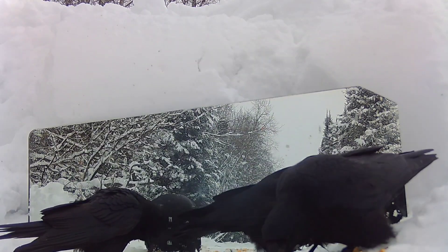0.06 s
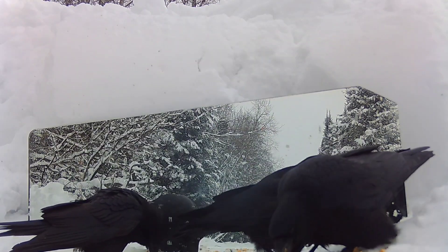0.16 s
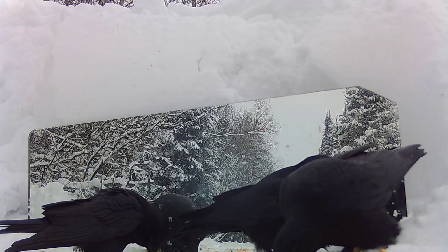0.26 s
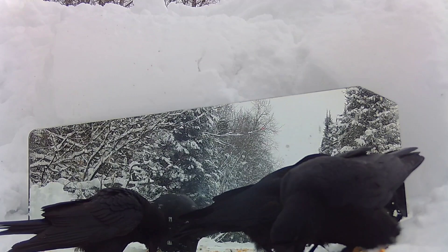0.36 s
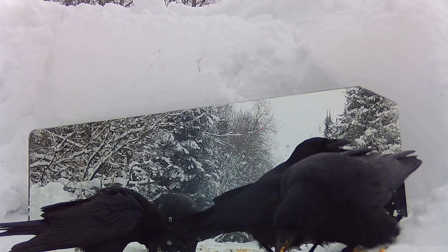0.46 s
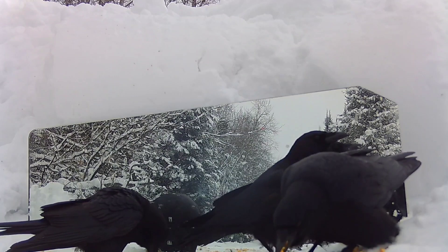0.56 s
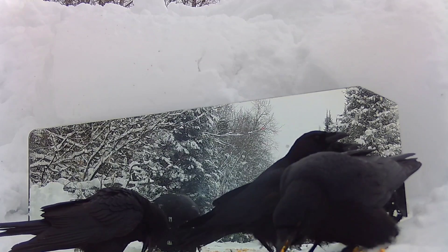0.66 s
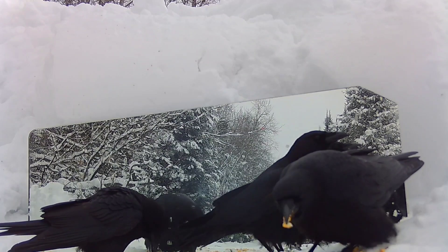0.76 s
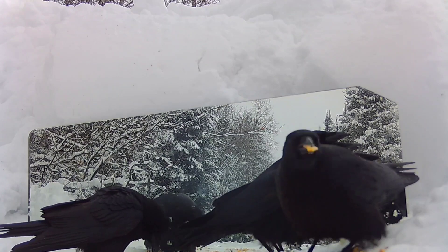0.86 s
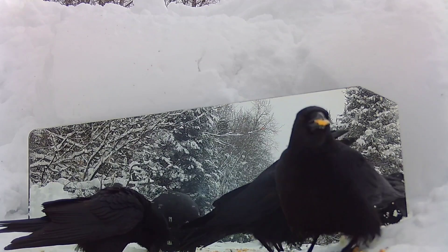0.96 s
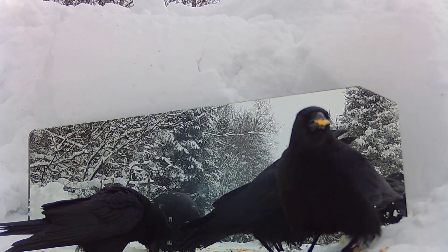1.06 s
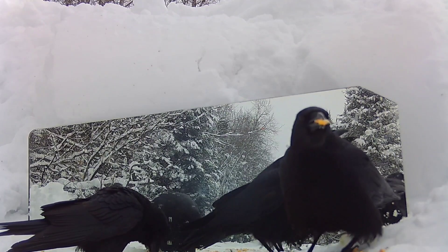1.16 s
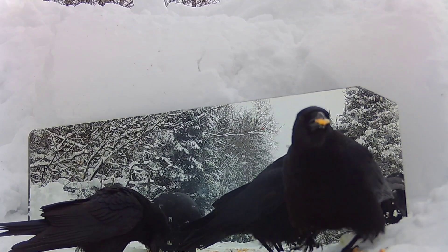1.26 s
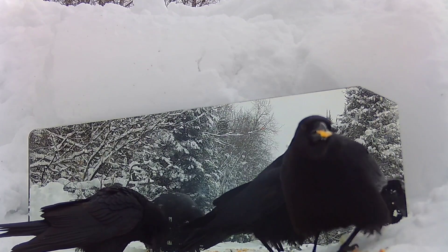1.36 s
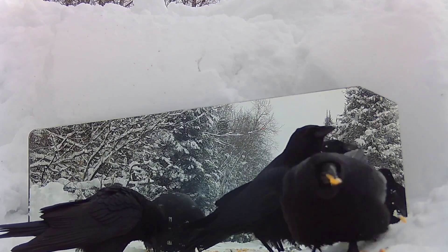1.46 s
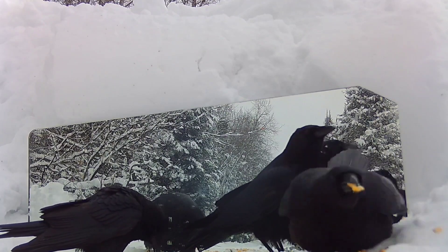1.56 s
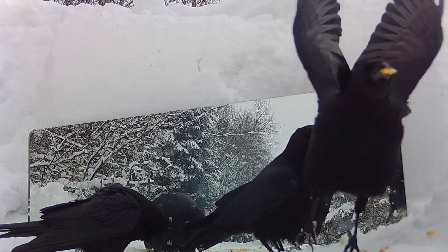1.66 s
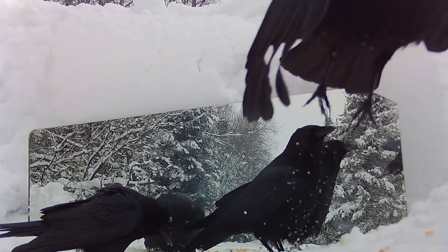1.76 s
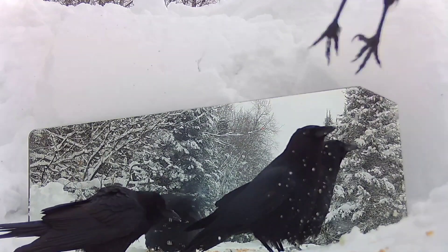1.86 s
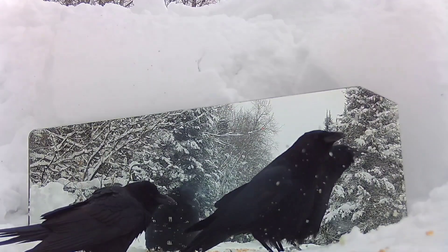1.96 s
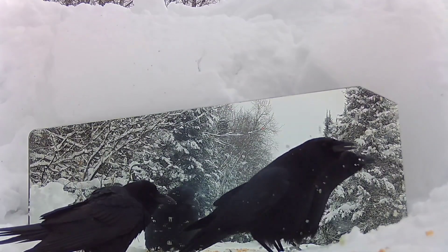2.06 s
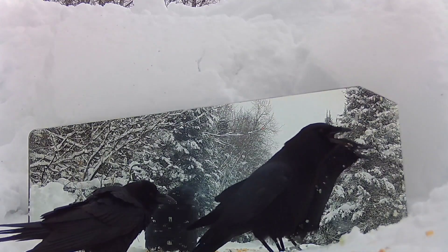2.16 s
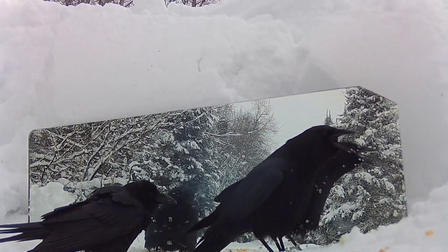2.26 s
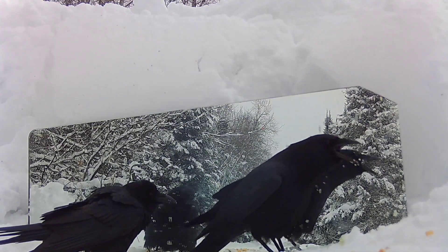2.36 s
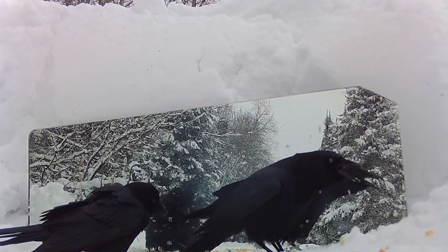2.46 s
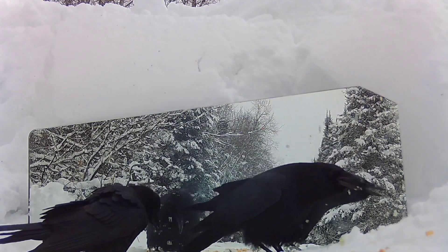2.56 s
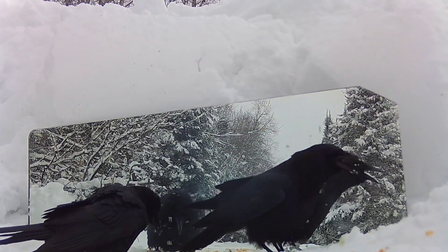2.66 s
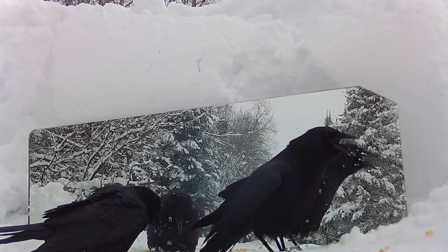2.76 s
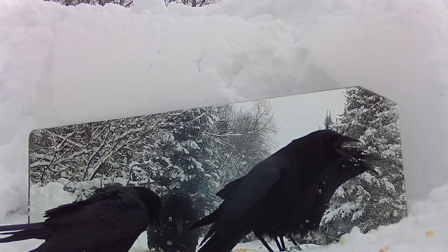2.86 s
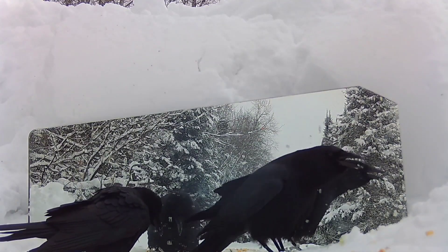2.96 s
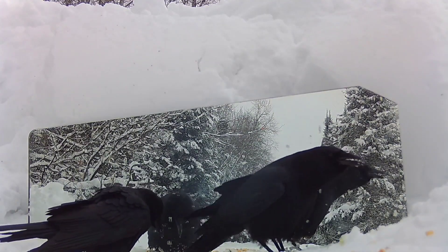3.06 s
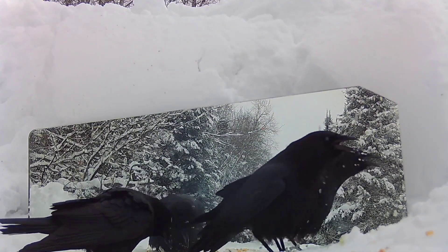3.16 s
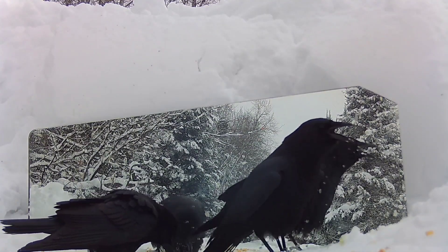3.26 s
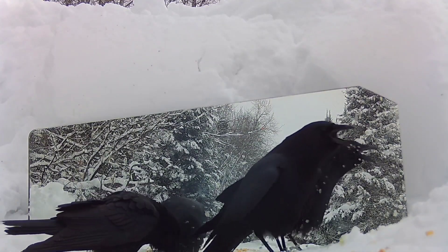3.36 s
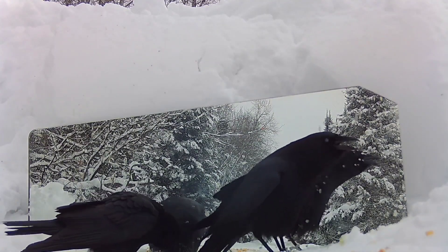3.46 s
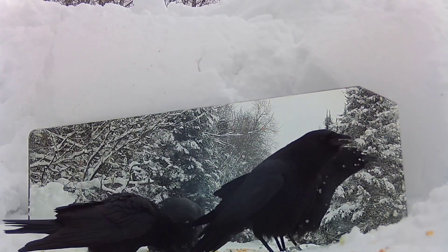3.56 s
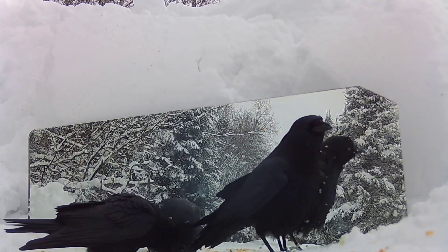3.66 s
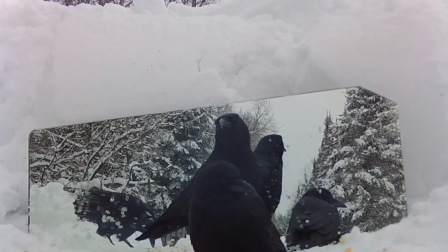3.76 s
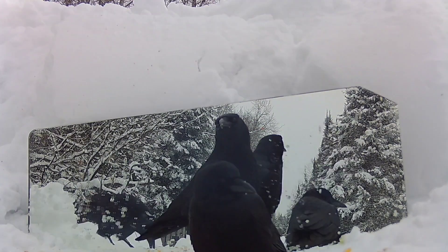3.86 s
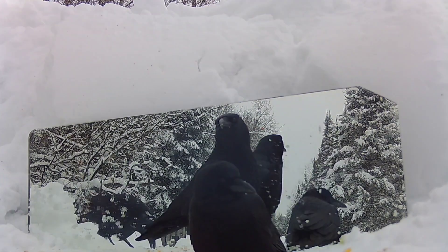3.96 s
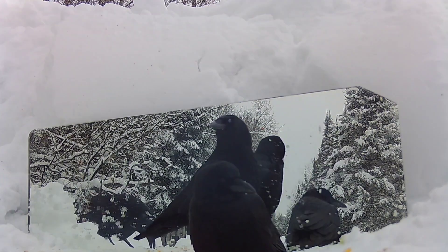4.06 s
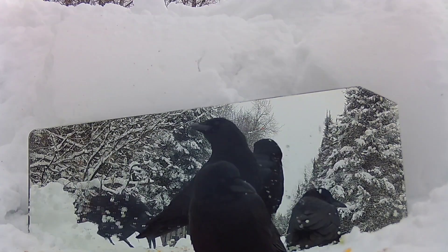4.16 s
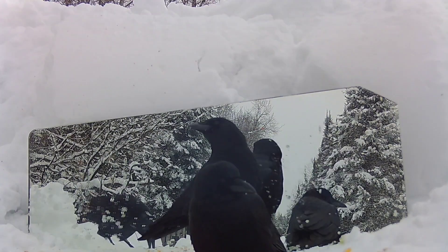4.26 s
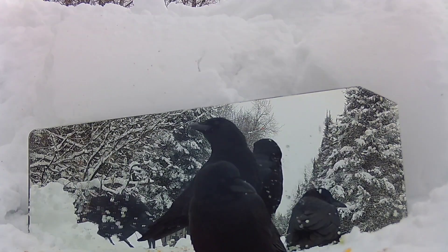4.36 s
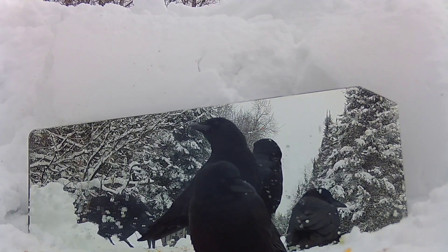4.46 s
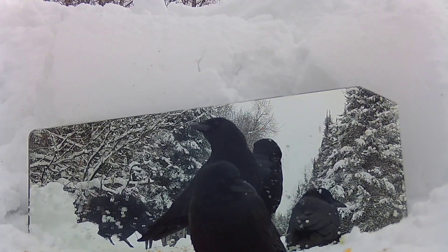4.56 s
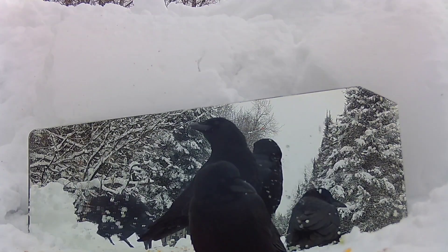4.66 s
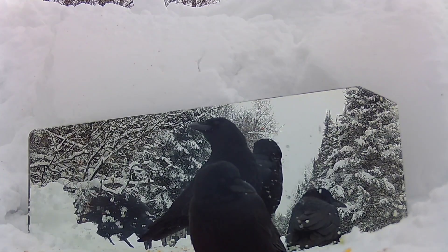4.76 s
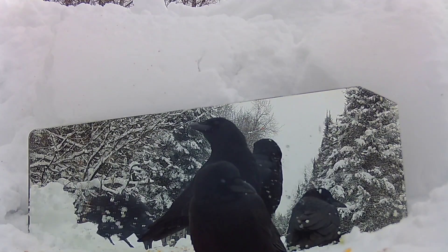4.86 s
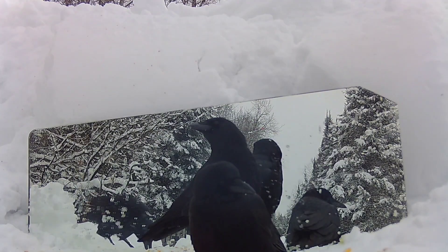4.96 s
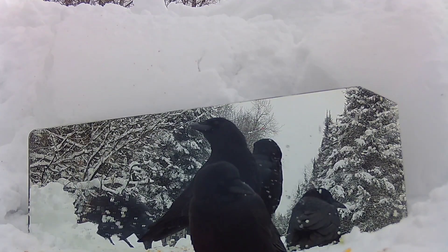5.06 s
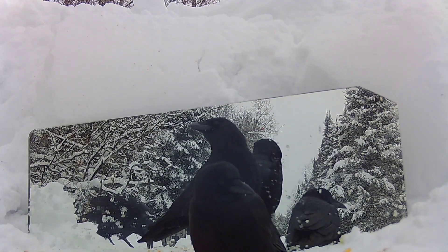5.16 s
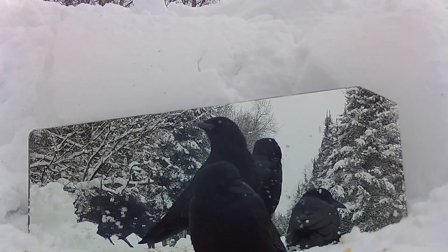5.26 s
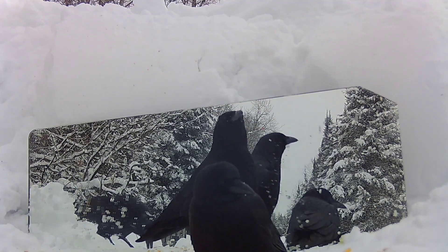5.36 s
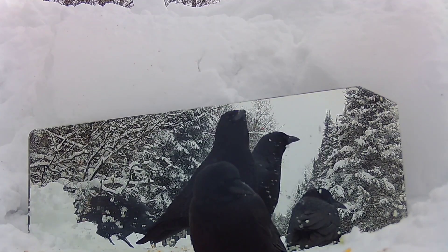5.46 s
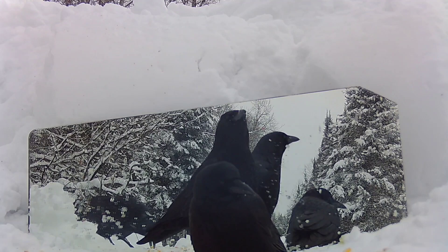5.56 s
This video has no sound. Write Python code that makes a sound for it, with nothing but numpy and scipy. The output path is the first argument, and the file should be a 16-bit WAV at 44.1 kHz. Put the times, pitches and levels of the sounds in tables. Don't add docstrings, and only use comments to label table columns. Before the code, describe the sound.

A crow takes off with rustling wings and buffeting air, another caws three times, harsh and overloaded, then a quiet snowy yard with a far engine.

```python
import sys
import numpy as np
from scipy import signal
from scipy.io import wavfile
from scipy.ndimage import uniform_filter1d

SR = 44100
rng = np.random.default_rng(int(sys.argv[2]) if len(sys.argv) > 2 else 0)


def nominal_scale(level):
    x = np.asarray(level, float) / 20
    return 10 ** x


def pcm_store(signal):
    levels = np.round(np.clip(np.atleast_2d(signal), -1, 1) * 32767)
    wavfile.write(sys.argv[1], SR, levels.astype(np.int16).T)


N = 246959
DROPOUT_START_S, DROPOUT_END_S = 3.7, 3.743


def read_spectrum(points, hz):
    table_hz, level_db = np.transpose(points)
    return np.interp(np.log(hz + 1), np.log(table_hz + 1), level_db)


def evened(x):
    return x / np.sqrt(np.mean(x ** 2) + 1e-20)


def add(mix, start_s, sound):
    part = mix[round(start_s * SR):][:len(sound)]
    part += sound[:len(part)]


def noise(colour, patchy_db, flicker_db, size):
    hz = np.fft.rfftfreq(size, 1 / SR)
    frames = 4 * N // size + 5
    real, imag, patches = rng.standard_normal((frames, len(hz), 3)).T
    patches = uniform_filter1d(patches, size=10, axis=0)
    patches = evened(uniform_filter1d(patches, size=8, axis=1))
    flicker = evened(uniform_filter1d(rng.standard_normal(frames), size=3))
    level_db = read_spectrum(colour, hz)[:, None] + patchy_db * patches + flicker_db * flicker
    spectrum = (real + 1j * imag) * nominal_scale(level_db)
    return evened(signal.istft(spectrum, nperseg=size, noverlap=3 * size // 4)[1][:N])


def swells(rows, rise_db, fall_db):
    t = np.arange(N) / SR
    gain = np.zeros(N)
    for peak_s, db, rise_s, fall_s in rows:
        rising = rise_db * (peak_s - t) / rise_s
        falling = fall_db * (t - peak_s) / fall_s
        gain += nominal_scale(db + np.where(t < peak_s, rising, falling))
    return uniform_filter1d(gain, size=200)


def ring(x, hz, width_hz):
    carrier = np.exp(2j * np.pi * np.cumsum(hz) / SR)
    decay = np.exp(-np.pi * width_hz / SR)
    return (carrier * signal.lfilter([1], [1, -decay], x / carrier)).imag


def place(at, sizes, count):
    taps = np.arange(-8, 9) + np.round(at)[:, None]
    shape = np.sinc(taps - at[:, None]) * np.hanning(taps.shape[1] + 2)[1:-1]
    index = np.clip(taps, 0, count - 1).astype(int)
    return np.bincount(index.ravel(), (shape * sizes[:, None]).ravel(), count)


# (frequency [Hz], density [dB per Hz])
HISS_COLOUR = [(8.8, -28), (15, -1.5), (52, -9.5), (300, -17), (509, -19), (1080, -21.5), (1780, -22.5),
               (3900, -22.5), (15800, -24)]


def preamp_hiss():
    return nominal_scale(-59.5) * noise(HISS_COLOUR, 0.93, .4, size=2048)


# (frequency [Hz], density [dB per Hz])
YARD_COLOUR = [(8.8, -41), (15, -15.5), (43, -8), (77, -3.5), (112, -7.5), (260, -7.5), (329, -13.5),
               (624, -18), (1050, -15.5), (2600, -26.5), (4650, -28), (6220, -26.5), (8330, -29),
               (14500, -29), (15800, -29)]


def yard_air():
    return nominal_scale(-54.5) * noise(YARD_COLOUR, 1.1, .5, size=2048)


def motor():
    t = np.arange(N) / SR
    note = evened(ring(rng.standard_normal(N), np.full(N, 75.1), 9.3))
    fade_db_per_s = -6
    return nominal_scale(-52 + fade_db_per_s * (t - DROPOUT_END_S)) * note


# (time [s], peak [dB], centre [Hz], body at 1-2.5 kHz [dB], thud below 1 kHz [dB])
TICK_EVENTS = [(0.281, -33.5, 7240, -14, -27), (0.2902, -41.5, 6070, -8, -17),
               (0.9567, -40.5, 6740, -16, -10), (1.3607, -48.5, 5940, -25, -10),
               (1.569, -43.5, 6600, -25, -15), (1.5868, -53, 6750, -21, -14),
               (1.786, -21.5, 6660, -22, -19), (1.81, -32, 6430, -27, -31), (1.9232, -27, 6260, -8.5, -35),
               (1.986, -27.5, 8240, -25, -18), (2, -32, 4470, -14, -11), (2.069, -34, 6600, -15, -8),
               (2.108, -37.5, 6060, -4, -1), (4.3072, -41.5, 5710, -28, -20), (4.7211, -47, 5600, -20, -21),
               (4.7391, -50, 5320, -12.5, -18.5), (4.8497, -56, 5990, -7, -22),
               (5.045, -54, 5190, -10.5, -18.5), (5.1801, -50, 6210, -10, -20),
               (5.278, -47, 6750, -17, -19.5), (5.2876, -50, 7190, -13, -20)]


def ticks():
    out = np.zeros(N)
    t = np.arange(2500) / SR
    attack_s, t60_s = 0.00039, 0.029
    for start_s, peak_db, hz, body_db, thud_db in TICK_EVENTS:
        burst = np.zeros(len(t))
        for low_hz, high_hz, db in [(0.74 * hz, 1.38 * hz, 0), (1000, 2400, body_db), (250, 900, thud_db)]:
            band = signal.butter(2, [low_hz, high_hz], "band", fs=SR)
            burst += nominal_scale(db) * evened(signal.lfilter(*band, rng.standard_normal(len(t))))
        envelope = nominal_scale(peak_db - 3.5 - 60 * t / t60_s) * np.minimum(t / attack_s, 1)
        add(out, start_s, envelope * burst)
    return out


# (time [s], level [dB], length [s])
AIR_PUSHES = [
    (2.5795, -10.5, .0155),
    (1.962, -26, .04),
    (2.957, -22, .025),
]


def air_pushes():
    out = np.zeros(N)
    lowpass = signal.butter(6, 1000, fs=SR, output="sos")
    rattle_band = signal.butter(2, [350, 950], "band", fs=SR)
    for start_s, db, length_s in AIR_PUSHES:
        u = np.arange(0, length_s, 1 / SR) / length_s
        push = np.tanh(1.8 * np.sin(2 * np.pi * u ** 1.3)) * np.sin(np.pi * u) ** .9
        rattle = evened(signal.lfilter(*rattle_band, rng.standard_normal(len(u)))) * np.sin(np.pi * u)
        thump = nominal_scale(db) * push + nominal_scale(2 * db - 11) * rattle
        add(out, start_s, signal.sosfilt(lowpass, np.r_[thump, np.zeros(300)]))
    return out


# (time [s], rustle [dB], heave [dB], buffet [dB],
# length [s])
STROKES_AND_GUSTS = [(1.362, -60, -85, -85, .03), (1.426, -66, -85, -85, .04), (1.58, -61, -79.5, -83, 0.27),
                     (1.72, -41.5, -46, -60, .05), (1.805, -36.5, -40, -36.5, 0.043),
                     (1.902, -46, -43, -58, 0.24), (1.99, -36.5, -32.5, -39, 0.061),
                     (2.075, -43, -37, -53, 0.021), (2.15, -43, -29.5, -41, 0.069),
                     (2.23, -79.5, -37, -55, 0.047), (2.42, -80, -40.5, -31, 0.13),
                     (2.528, -81.5, -27, -17.5, 0.079), (2.6, -79, -22, -22.5, 0.015),
                     (2.8, -80.5, -23.5, -60.5, 0.12), (2.93, -80.5, -33.5, -35, 0.067),
                     (3.06, -80, -40.5, -58, 0.095), (3.18, -80.5, -49, -53.5, 0.045),
                     (3.316, -81, -40, -70, 0.059), (3.426, -78.5, -38.5, -70.5, 0.04),
                     (3.53, -80.5, -56, -81, 0.068)]
# (rustle [dB], heave [dB], buffet [dB])
STROKE_LOSS_DB = (-11.5, -13, -16.5)
# (frequency [Hz], density [dB per Hz])
RUSTLE_COLOUR = [(240, -25), (400, -4), (1090, -9), (1520, -4), (2270, -8.5), (2820, -4.5), (4550, -4.5),
                 (6470, 4), (9220, -1.5), (14900, -16.5), (15800, -24)]
HEAVE_COLOUR = [(8, -2.5), (30, 4.5), (70, -7.5), (120, -14.5), (300, -46), (1000, -77)]
PORT_BUFFET_COLOUR = [(40, -23), (90, 0), (160, 0), (260, -6.5), (500, -17), (900, -32.5), (1500, -58.5),
                      (4000, -82)]


def wings():
    gains = []
    for layer, fall_db in enumerate(STROKE_LOSS_DB):
        rows = [(s, levels[layer], 0.6 * length, length) for s, *levels, length in STROKES_AND_GUSTS]
        gains.append(swells(rows, fall_db, fall_db))
    rustle, heave, buffet = gains
    out = nominal_scale(-2.27) * rustle * noise(RUSTLE_COLOUR, 1.6, 3.2, size=256)
    out += nominal_scale(-.5) * heave * noise(HEAVE_COLOUR, 1.5, 1.2, size=2048)
    out += nominal_scale(-2.0) * buffet * noise(PORT_BUFFET_COLOUR, 2.0, 1.0, size=1024)
    return out + air_pushes()


# (start [s], strongest [s], end [s], level [dB])
BREATHS = [
    (2.525, 2.64, 2.75, -46.5),
    (2.964, 3, 3.16, -52.5),
    (3.033, 3.181, 3.195, -50.5),
    (3.48, 3.54, 3.669, -56.5),
]
# (frequency [Hz], density [dB per Hz])
BREATH_COLOUR = [(530, -49.5), (900, -19), (1060, -47), (1270, -3.5), (1680, -21.5), (2850, -23.5),
                 (3360, -8.5), (4010, -24), (4360, -10.5), (5140, -11.5), (6820, 0.5), (8430, -10),
                 (9820, -11.5), (11700, -25), (15000, -47)]


def breaths():
    rows = [(top, db, top - start, end - top) for start, top, end, db in BREATHS]
    edge_db = -17
    return nominal_scale(2.0) * swells(rows, edge_db, edge_db) * noise(BREATH_COLOUR, 2.7, 1.2, size=512)


# (time after start [s], share of top rate [0-1])
RATE_ARCH = [(0, .55), (.007, .72), (.033, .91), (.048, .975), (.061, 1), (.076, .965), (.11, .855),
             (.155, .765), (.215, .72)]
# (time from end [s], share kept [0-1])
RATE_LET_GO = [(-.08, 1), (-.058, .93), (-.038, .845), (-.021, .7), (0, .5)]
# (pulse rate [Hz], depth [0-1])
FLUTTER_BY_RATE = [(310, .01), (400, .07), (500, .065), (640, .045)]
# (frequency [Hz], width [Hz], level [dB])
THROAT_MODES = [
    (443, 110, -26),
    (1270, 165.5, -0.5),
    (1479.6, 280, -3.5),
]
SQUEEZE_SHARES = (1, 0.88, -0.24)
MODE_SIGNS = [1, 1, -1, 1, -1, 1, 1, -1, -1, -1, 1, -1, 1]
TURN_HZ = 6200


def caw(call, pose, catches, beak_modes, notches):
    start_s, length_s, top_hz, settled_hz = call
    push_db, throat, gape, glide, tilt_db = pose
    t = np.arange(catches[0][0] - .002, start_s + length_s + .03, 1 / SR)
    sample = np.arange(len(t))
    age = np.clip(t - start_s, 0, length_s)
    left = np.clip(t - start_s - length_s, -length_s, 0)

    share = np.interp(age, *np.transpose(RATE_ARCH)) - .4 * np.maximum(age - RATE_ARCH[-1][0], 0)
    hz = top_hz * share * np.interp(left, *np.transpose(RATE_LET_GO))
    surge = np.maximum(1 - abs(age - .063) / 0.053, 0)
    effort_db = push_db + 1.5 - 14 * age + 3.5 * surge
    effort_db += -5.5 * np.maximum(1 - age / .016, 0)
    effort_db += -23.5 * np.exp(left / 0.011)

    flutter_hz = np.interp(age, (.064, .106), [74, settled_hz]) * (age > 0)
    skew, peaked = .3, .2
    phase = 2 * np.pi * (np.cumsum(flutter_hz) / SR - .4) - skew
    flutter = np.cos(phase) - skew * np.sin(2 * phase) + peaked * np.cos(2 * phase)
    flutter *= np.interp(hz, *np.transpose(FLUTTER_BY_RATE))

    cycles = np.cumsum(hz * (1 + flutter) * (age > 0) * (left < 0)) / SR
    k = np.arange(int(cycles[-1]) + 1)
    jitter, shimmer = rng.standard_normal((2, len(k)))
    at = np.interp(k + .005 * jitter + .03, cycles, sample)
    size = nominal_scale(np.interp(at, sample, effort_db) + .9 * shimmer)
    size *= 1 + np.interp(at, sample, flutter)
    lone_s, lone_db = np.transpose(catches)
    pulses = place(np.r_[at, (lone_s - t[0]) * SR], np.r_[size, nominal_scale(lone_db)], len(t))
    puff = signal.lfilter([1], [1, -np.exp(-1 / (0.0005 * SR))], abs(pulses))
    pulses = pulses + .042 * puff * rng.standard_normal(len(t))

    turn = age / length_s - .5
    tract = []
    for squeeze, (f, width_hz, db) in zip(SQUEEZE_SHARES, THROAT_MODES):
        tract.append((f * (throat - squeeze * 0.097 * surge), width_hz, db))
    for f, width_hz, db in beak_modes:
        tilt = tilt_db * turn * np.sign(f - TURN_HZ) / 2
        tract.append((f * (gape + glide * turn * (f < TURN_HZ)), width_hz, db + tilt))
    voice = np.zeros(len(t))
    for sign, (f, width_hz, db) in zip(MODE_SIGNS, tract):
        voice += sign * nominal_scale(db) * ring(pulses, f, width_hz)
    for f, width_hz in notches:
        voice = signal.lfilter(*signal.iirnotch(f, f / width_hz, SR), voice)
    return t[0], nominal_scale(-0.5) * voice


def trees_echo(voice):
    t = np.arange(SR // 2) / SR
    trees = rng.standard_normal(len(t)) * nominal_scale(-60 * t / .6) * (t > .01)
    trees = signal.lfilter(*signal.butter(2, 1900, fs=SR), trees)
    return nominal_scale(-47.5) * signal.fftconvolve(voice, trees / np.linalg.norm(trees))[:N]


# (start [s], length [s], top pulse rate [Hz], settled flutter [Hz])
CAW_EVENTS = [
    (2.1636, .3555, 632, 56),
    (2.7113, .2467, 645, 50),
    (3.2169, .2476, 657, 49),
]
# (effort [dB], throat factor [1], beak factor [1], turn glide [1], turn tilt [dB])
HEAD_POSES = [
    (0, 1.069, 0.97, -.07, 10.5),
    (0, 1.04, 1.0, .01, 0),
    (0.3, 1.05, 1.0, .01, 2),
]
# (time [s], level [dB])
VOICE_CATCHES = [
    [(2.148, -10), (2.158, -4), (2.1598, -6)],
    [(2.6973, -17), (2.7039, -23), (2.7058, -6), (2.7073, -5)],
    [(3.2028, -15), (3.2117, -11), (3.2127, -6)],
]
# (frequency [Hz], width [Hz], level [dB])
SIDE_MODES = [(2300, 600, -21), (3150, 460, -10.5), (3810, 720, -8.5), (4960, 1100, -5), (5600, 520, 0),
              (6690, 700, 2.5), (7540, 450, -13.5), (9340, 290, -21.5), (9800, 610, -19.5),
              (13000, 1300, -17.5)]
AWAY_MODES = [(2130, 600, -9), (2870, 480, -11), (3530, 600, -6.5), (4530, 730, -5), (5910, 290, -0.5),
              (6896, 490, -2.5), (8100, 2200, -24.5), (9766, 1800, -20.5), (9660, 800, -13),
              (12700, 5000, -17)]
# (frequency [Hz], width [Hz])
SIDE_NOTCHES = [(560, 94), (860, 420), (4550, 330)]
AWAY_NOTCHES = [(545, 45), (870, 550), (4280, 830), (7700, 400)]


def crow():
    voice = np.zeros(N)
    modes = [SIDE_MODES, AWAY_MODES, AWAY_MODES]
    notches = [SIDE_NOTCHES, AWAY_NOTCHES, AWAY_NOTCHES]
    for call in zip(CAW_EVENTS, HEAD_POSES, VOICE_CATCHES, modes, notches):
        add(voice, *caw(*call))
    return voice + trees_echo(voice) + breaths()


def scene():
    t = np.arange(N) / SR
    before = (preamp_hiss() + wings() + crow()) * (t < DROPOUT_START_S)
    after = (yard_air() + motor()) * np.clip((t - DROPOUT_END_S) / 0.0047, 0, 1)
    return (before + after + ticks())[None]


def roll_off(x):
    return signal.sosfilt(signal.butter(12, 16490, fs=SR, output="sos"), x)


def record(dry):
    ceiling, knee = np.where(dry > 0, .75, .8), 5.0
    flat = dry / (1 + abs(dry / ceiling) ** knee) ** (1 / knee)
    band_limit = signal.firwin(801, 15710, window=("kaiser", 8), fs=SR)
    limited = signal.oaconvolve(flat, band_limit[None], "same")
    return roll_off(limited)


dry = scene()
out = record(dry)
pcm_store(out)
```